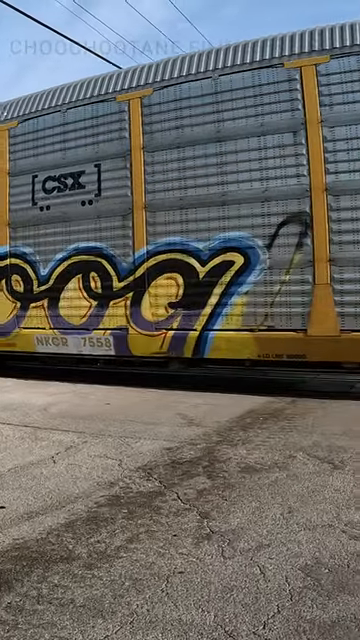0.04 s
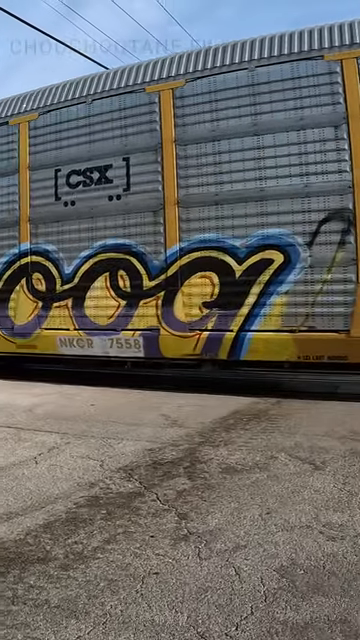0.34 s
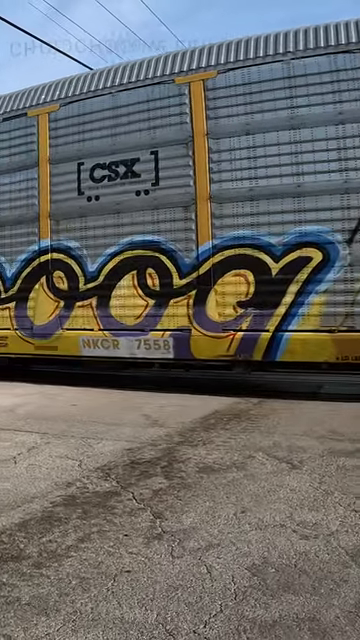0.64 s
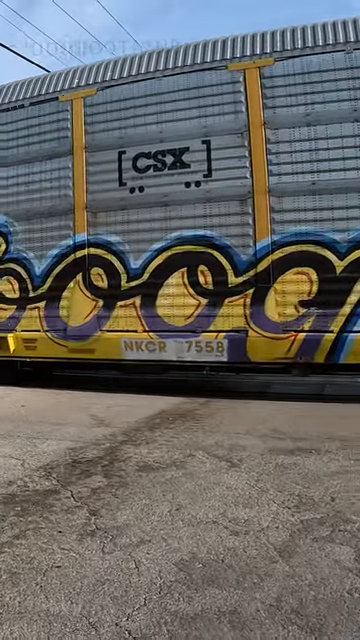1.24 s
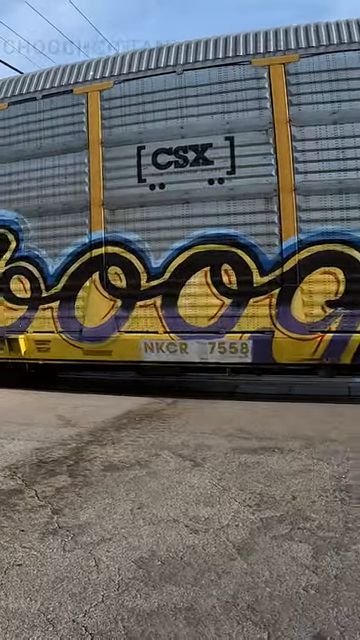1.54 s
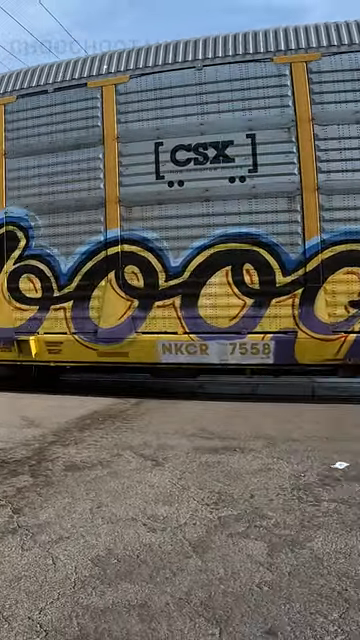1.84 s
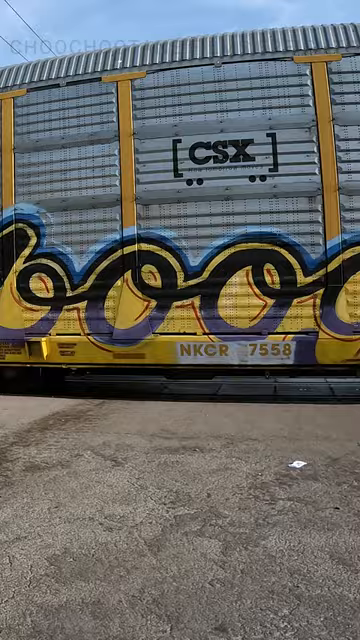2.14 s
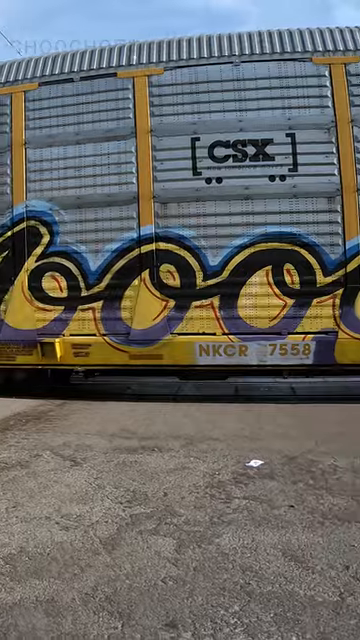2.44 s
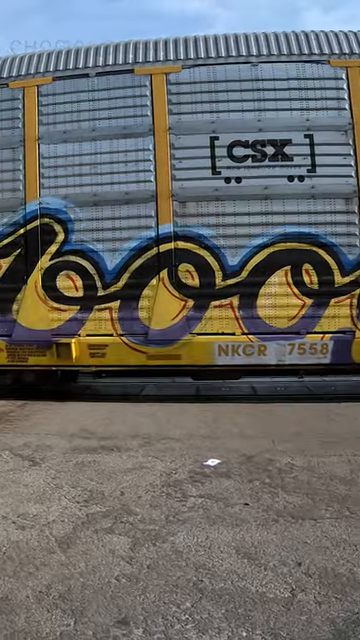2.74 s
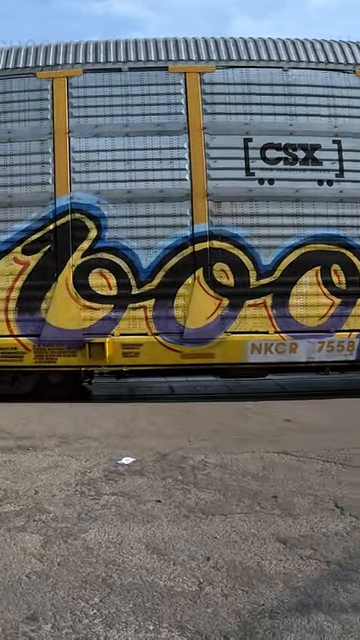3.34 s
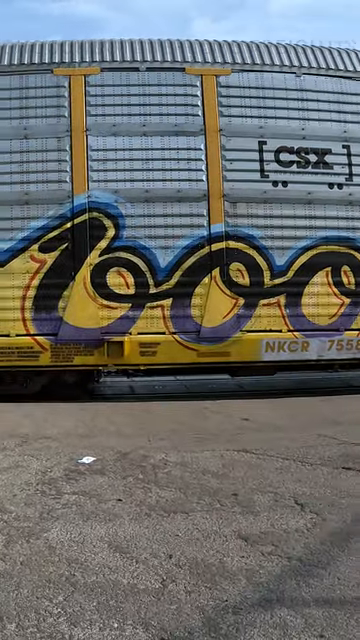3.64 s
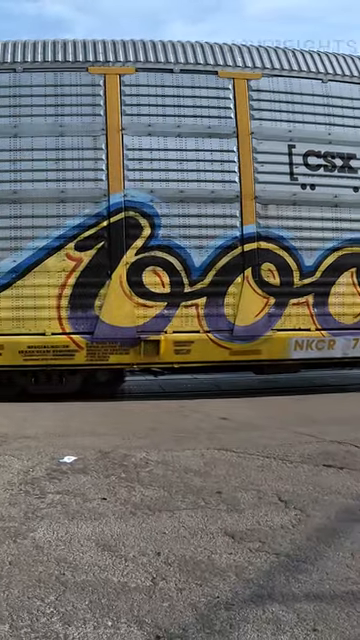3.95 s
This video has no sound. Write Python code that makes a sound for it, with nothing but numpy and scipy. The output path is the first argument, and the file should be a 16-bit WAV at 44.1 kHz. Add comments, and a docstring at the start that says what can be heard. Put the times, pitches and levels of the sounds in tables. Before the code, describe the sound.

A freight train rolls slowly past close by in an open paved yard, rumbling steadily. Its wheels knock and rattle the metal sides, squeal and scrape briefly, then knock again in a longer run.

```python
"""A tall freight car with sheet-metal sides rolls slowly past across an open paved yard.
Its body rumbles; the wheels roar on rough rail and knock over a joint. Each blow thumps the
frame and sets the panels rattling and the hollow body booming. Between knocks a flange
briefly squeals (stick-slip) and scrapes. Near the end the next bogie rolls by."""
import sys
import numpy as np
from scipy import signal
from scipy.fft import rfft, irfft
from scipy.io import wavfile
from scipy.ndimage import uniform_filter1d

SR = 44100
rng = np.random.default_rng(int(sys.argv[2]) if len(sys.argv) > 2 else 0)


def put_to_file(sound):
    """Save the sound as 16-bit audio at rate SR, in the file named by the first command-line argument."""
    columns = np.atleast_2d(sound).T  # one column per channel
    safe = np.clip(columns, -1, 1)
    whole_steps = np.round(safe * 32767)
    wavfile.write(sys.argv[1], SR, whole_steps.astype(np.int16))


N = 176400

TIME_S, FREQ_HZ = np.arange(N) / SR, np.arange(N // 2 + 1) * SR / N
EARS = np.array([[1], [-1]])  # left, right
PAN_CORNER_HZ, ROLL_PAN_DB = 600, 3.5  # pan: left minus right
# steel resonances of wheels and side sheets: pitch_hz, width_hz, level_db
STEEL_MODES = [(748, 14, -6), (1543, 18, -11), (2580, 130, -14), (3148, 60, -18), (3695, 50, -14.5),
               (5443, 18, -30)]


def undb(db):
    return 10 ** (np.asarray(db) / 20)


def unit(x):
    return x / np.sqrt(np.mean(x ** 2))


def since(start_s):
    return np.maximum(TIME_S - start_s, 0)


def curve(points):
    """Gain through (freq_hz, level_db) points on a log axis; steep fall past the ends."""
    knots_hz, db = np.array(points, float).T
    hz = np.maximum(FREQ_HZ, 1)
    gain = undb(np.interp(np.log(hz), np.log(knots_hz), db))
    return gain * np.minimum(hz / knots_hz[0], 1) ** 2 * np.minimum(knots_hz[-1] / hz, 1) ** 2


def resonances(modes, size=N):
    """Power-summed gain of (pitch_hz, width_hz, level_db) modes."""
    f = np.fft.rfftfreq(size, 1 / SR) + 1
    return np.sqrt(sum(undb(db) ** 2 / width / (1 + ((f * f - hz * hz) / (f * width)) ** 2) ** 2
                       for hz, width, db in modes))


def noise(gain, pan_db=0):
    """Coloured stereo noise, unit RMS; bass central and alike in both ears."""
    # diffuse share: freq_hz, side_to_mid_db
    width = [(30, -39.5), (85, -22.5), (180, -20.5), (350, -12.5), (700, -12), (1400, -8), (2800, -12),
             (5500, -4.5)]
    mid, side = rfft(rng.standard_normal((2, N)))
    pan = undb(EARS * pan_db / 2 * FREQ_HZ / (FREQ_HZ + PAN_CORNER_HZ))
    return unit(irfft(gain * pan * (mid + EARS * side * curve(width)), N))


def walk(rate_hz):
    """Smooth random drift, unit RMS."""
    lowpass = np.exp(-(FREQ_HZ / rate_hz) ** 2) * (FREQ_HZ > 0)
    return unit(irfft(rfft(rng.standard_normal(N)) * lowpass, N))


def envelope(attack_s, t60_s, hold_s=0, start_s=0):
    """Linear attack, hold, exponential release."""
    release = np.exp(-np.log(1000) * since(start_s + attack_s + hold_s) / t60_s)
    return np.minimum(since(start_s) / attack_s, 1) * release


def placed(x, start_s, pan_db):
    """Pan all but the bass, then shift to start_s."""
    bass = signal.lfilter(*signal.butter(1, PAN_CORNER_HZ, fs=SR), x + 1e-18)
    panned = bass + (x - bass) * undb(EARS * pan_db / 2)
    shift = round(start_s * SR)
    skip, delay = max(-shift, 0), max(shift, 0)
    return np.pad(panned[:, skip:N - delay], ((0, 0), (delay, skip)))


def rumble():
    """The heavy body shakes fairly evenly; the upper rumble eases between bogies."""
    # body rumble spectrum: freq_hz, density_db
    spectrum = [(18, -3), (27, 5.5), (35, -7), (47, 3), (62, -2.5), (85, -5.5), (115, -9.5), (160, -29)]
    # rumble above split_hz: time_s, gain_db
    upper_levels = [(0, 4), (0.802, 0.5), (1.25, -1.5), (1.701, -0.5), (2.3, -4.5), (2.7, 0), (3.3, -5.5),
                    (4, -1)]
    split_hz = 54
    shake = noise(curve(spectrum), ROLL_PAN_DB)
    power = uniform_filter1d(abs(signal.hilbert(shake[0])) ** 2, size=4000)
    shake = unit(shake / power ** 0.058)  # slight levelling
    deep = irfft(rfft(shake) / (1 + (FREQ_HZ / split_hz) ** 4), N)
    upper_gain = undb(np.interp(TIME_S, *np.array(upper_levels).T))
    return undb(-18) * (deep + (shake - deep) * upper_gain)


def rolling():
    """Wheels on rough rail: octave bands swell together and flicker alone; the steel rings faintly."""
    # wheel-on-rail spectrum: freq_hz, density_db
    spectrum = [(90, 0.5), (130, 2.5), (200, -1.5), (245, -4.5), (300, -4.5), (400, -9.5), (560, -11.5),
                (800, -16), (1100, -19), (1600, -21), (2100, -25.5), (2800, -29), (3300, -32.5),
                (3800, -35), (4600, -44.5), (6000, -47), (7300, -66)]
    steady = rfft(noise(curve(spectrum), ROLL_PAN_DB))
    swell_db = 0.5 * walk(rate_hz=0.29)
    octave = np.log2(np.clip(FREQ_HZ, 2 ** 5, 2 ** 13))
    roar = 0
    for k in range(5, 14):
        band = irfft(steady * np.maximum(1 - abs(octave - k), 0), N)
        flicker_db = 1.3 * walk(rate_hz=23)
        roar += band * undb(swell_db + flicker_db)
    return undb(-26) * unit(roar) + undb(-56.5) * noise(resonances(STEEL_MODES), ROLL_PAN_DB)


def rattle():
    """Envelope of many small contacts between loose sheets, each dying within milliseconds."""
    rate_hz, spread_db, power_share = 180, 6.5, 0.18
    rise_s = decay_s = 0.0013
    contacts = rng.random(N) < rate_hz / SR
    power = contacts * undb(-spread_db * np.clip(rng.standard_normal(N), -2, 2)) ** 2
    for tau_s in (rise_s, decay_s):
        power = signal.lfilter([1], [1, -np.exp(-1 / (tau_s * SR))], power)
    return np.sqrt(1 - power_share + power_share * power / power.mean())


def panels(pan_db=0):
    """Dense panel resonances with a few steel modes standing out."""
    # side panels and hollow body: freq_hz, density_db
    spectrum = [(120, 12), (300, 1.5), (560, 3), (800, -3), (1100, -2.5), (1600, -8), (2100, -8.5),
                (2700, -11.5), (3200, -17), (3800, -19), (4500, -26), (6200, -32), (7500, -55)]
    return noise(curve(spectrum), pan_db) + undb(-20) * noise(resonances(STEEL_MODES), pan_db)


def clank(pitch_hz):
    """Short steel modes, plus the same pitches scattered from the car's underside."""
    # struck steel modes: pitch_ratio, t60_s, level_db
    modes = [(.83, .055, -5), (1.0, .07, 0), (1.19, .06, -7), (1.45, .04, -18), (2.88, .04, -19)]
    attack_s, scatter_width_hz, size = 0.0012, 260, SR // 2
    ring = sum(undb(db) * np.sin(2 * np.pi * pitch_hz * ratio * TIME_S) * envelope(attack_s, t60_s)
               for ratio, t60_s, db in modes)
    mid, side = rng.standard_normal((2, size))
    hiss = mid + EARS * undb(-9) * side
    colour = resonances([(pitch_hz * ratio, scatter_width_hz, db) for ratio, _, db in modes], size)
    scatter = unit(irfft(rfft(hiss) * colour, size)) * envelope(attack_s, t60_s=0.16)[:size]
    return np.pad(ring[:size] + undb(-9.5) * scatter, ((0, 0), (0, N - size)))


def knocks():
    """Each blow cracks, clanks, thumps the frame and shakes the panels; their treble dies first."""
    # wheel and running-gear blows:
    # start_s, thump_db, clank_db, clank_hz, crack_db, panel_db, ring_db, pan_db
    blows = [(-.12, -21, -43, 900, -50, -24, -40, -0.5),
             (0.058, -14.5, -17.5, 1220, -29.5, -23.5, -32.5, 1.5),
             (0.152, -21, -26, 600, -32, -29, -37, 1.5), (0.252, -20, -36, 750, -36, -35, -42, 1.5),
             (2.319, -41.5, -22, 590, -55, -56, -60, -1), (2.464, -19.5, -20.5, 680, -28, -24.5, -40, 3.5),
             (2.604, -18, -12.5, 970, -22, -25, -42, 4), (2.624, -16, -17.5, 1080, -27, -31, -45, 4),
             (2.885, -35, -26.5, 710, -40, -28.5, -45, 5), (3.003, -34, -38, 900, -33, -42, -50, 6),
             (3.060, -19.5, -22, 625, -30.5, -26.5, -42, 6), (3.190, -15, -27, 863, -36, -32, -45, 7.5),
             (3.212, -25, -21.5, 1250, -25.5, -24, -40, 7.5)]
    # frame thump: freq_hz, density_db
    thump_spectrum = [(40, -35.5), (90, 9), (140, -0.5), (200, 3.5), (320, -1.5), (480, -24), (900, -20.5)]
    # steel-on-steel crack: freq_hz, density_db
    crack_spectrum = [(450, 15.5), (1200, -4.5), (1900, -3), (3000, -4.5), (4200, -14.5), (6500, -29)]
    # side-sheet resonances: pitch_hz, width_hz, level_db
    sheet_modes = [(748, 12, -4), (915, 14, -7), (1130, 14, -5), (1319, 14, -6), (1545, 20, -1),
                   (1701, 26, -5)]
    panel_attack_s, panel_hold_s, split_hz = 0.016, 0.054, 1500
    shake, sheets = rattle(), panels()
    low = signal.sosfilt(signal.butter(1, split_hz, fs=SR, output="sos"), sheets)
    thump = noise(curve(thump_spectrum)), envelope(attack_s=0.0056, t60_s=0.81, hold_s=0.0074)
    crack = noise(curve(crack_spectrum)), envelope(attack_s=0.001, t60_s=0.15)
    boom = low * shake, envelope(panel_attack_s, t60_s=2.54, hold_s=panel_hold_s)
    clatter = (sheets - low) * shake, envelope(panel_attack_s, t60_s=1.59, hold_s=panel_hold_s)
    ring = noise(resonances(sheet_modes)), envelope(panel_attack_s, t60_s=1.7)
    out = 0
    for start_s, thump_db, clank_db, clank_hz, crack_db, panel_db, ring_db, pan_db in blows:
        shift = rng.integers(N)  # no two blows alike
        hit = undb(clank_db) * clank(clank_hz)
        layers = [(thump, thump_db), (crack, crack_db), (boom, panel_db),
                  (clatter, panel_db), (ring, ring_db)]
        for (sound, shape), level_db in layers:
            hit += undb(level_db) * shape * np.roll(sound, shift, axis=1)
        out += placed(hit, start_s, pan_db)
    return out


def flange_squeals():
    """The flange sticks and slips: short rough tones that settle on a wheel resonance."""
    # squeals: start_s, length_s, pitch_hz, overshoot_hz, jitter_ratio, level_db
    squeals = [(0.544, .02, 5440, 2.5, 0.08, -54), (1.055, 0.071, 6000, 2, 0, -61.5),
               (1.685, 0.105, 2820, 400, 0.04, -38.3), (2.162, .035, 4150, 0.5, 0.02, -51),
               (2.5, 0.07, 3700, 5.5, 0.01, -43)]
    rise_s, settle_s = 0.016, 0.015
    jitter, flutter = walk(rate_hz=250), undb(3.5 * walk(rate_hz=90))
    out = 0
    for start_s, length_s, pitch_hz, overshoot_hz, jitter_ratio, level_db in squeals:
        glide_hz = pitch_hz + overshoot_hz * np.exp(-since(start_s) / settle_s)
        phase = 2 * np.pi * np.cumsum(glide_hz * (1 + jitter_ratio * jitter)) / SR
        shape = envelope(rise_s, t60_s=0.18, hold_s=max(length_s - rise_s, 0), start_s=start_s)
        out += undb(level_db) * shape * flutter * np.sin(phase)
    return out


def flange_scrapes():
    """Gritty scrapes against the rail that stir the panels."""
    # flange contacts: start_s, length_s, hiss_db, panel_db
    scrapes = [(0.865, 0.28, -65, -34.5), (1.52, 0.26, -51.5, -32), (1.98, 0.302, -61, -35),
               (2.492, 0.15, -43.5, -37), (2.668, 0.136, -42.5, -31.5), (3.45, 0.31, -47, -46)]
    # friction hiss: freq_hz, density_db
    spectrum = [(1200, -21.5), (2500, 4.5), (3800, -2), (4600, -6.5), (6100, -11.5), (7500, -24.5)]
    edge_s = 0.025
    grit, hiss, sheets = rattle(), noise(curve(spectrum), pan_db=8.5), panels(ROLL_PAN_DB)
    out = 0
    for start_s, length_s, hiss_db, panel_db in scrapes:
        rub = np.minimum(since(start_s) / edge_s, 1) * np.exp(-since(start_s + length_s) / edge_s)
        out += rub * grit * (undb(hiss_db) * hiss + undb(panel_db) * sheets)
    return out


def bogie():
    """Rattling swells and fades as the next bogie rolls by."""
    nearest_s, sigma_s = 3.55, 0.085
    swell = np.exp(-0.5 * ((TIME_S - nearest_s) / sigma_s) ** 2)
    return undb(-31) * swell * panels(pan_db=6.5) * rattle()


def scene():
    """Steady rumble and roar, wheel noises on top."""
    return rumble() + rolling() + knocks() + flange_squeals() + flange_scrapes() + bogie()


def record(dry):
    """Steep low-pass."""
    cutoff_hz = 7300
    return signal.sosfilt(signal.ellip(8, 0.2, 70, cutoff_hz, fs=SR, output="sos"), dry)


dry = scene()
out = record(dry)
put_to_file(out)
```